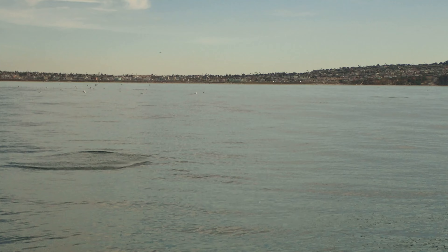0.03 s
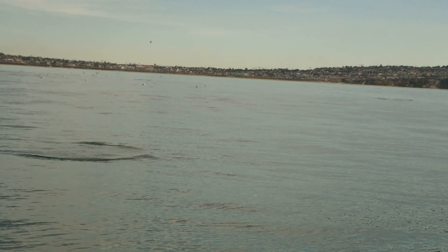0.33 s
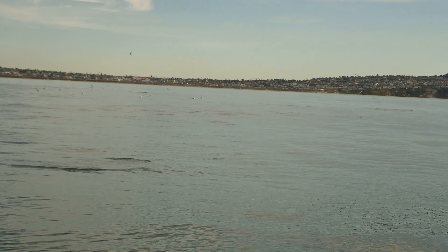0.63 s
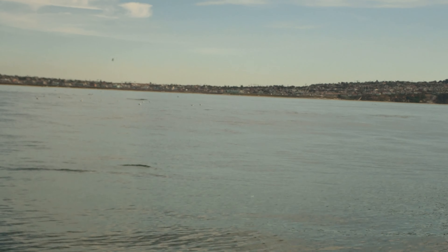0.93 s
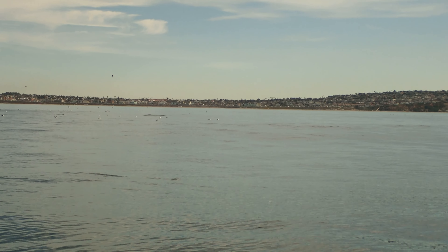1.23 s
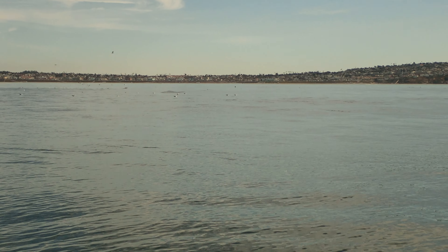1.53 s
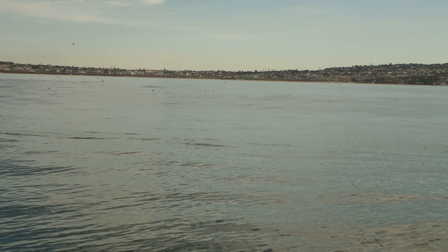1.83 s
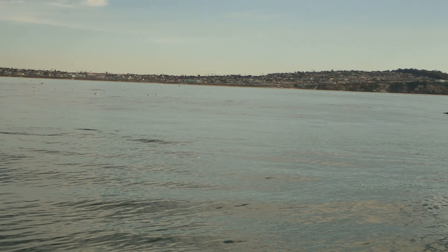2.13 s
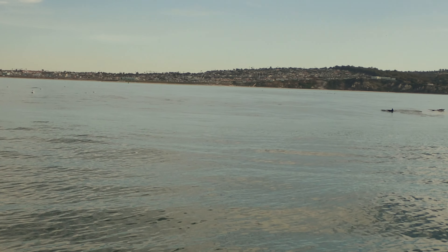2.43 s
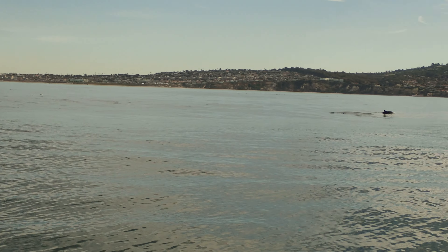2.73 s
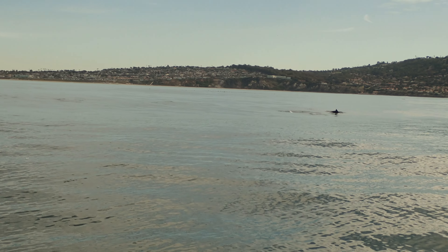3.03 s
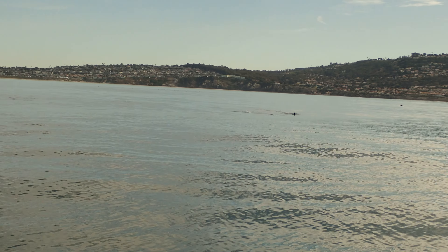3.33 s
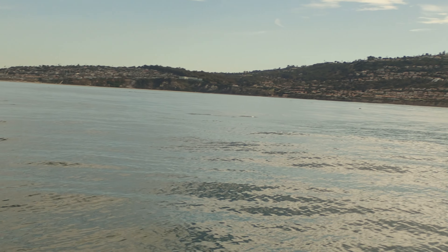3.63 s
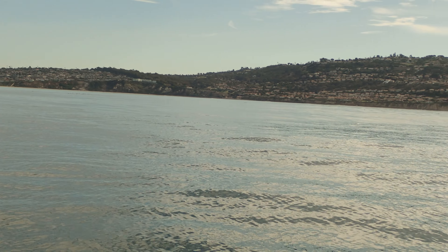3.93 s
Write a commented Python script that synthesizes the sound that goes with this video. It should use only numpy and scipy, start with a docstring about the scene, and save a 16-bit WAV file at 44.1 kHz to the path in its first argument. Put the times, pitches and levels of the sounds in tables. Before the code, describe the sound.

Distant birds yelp over and over above a low rumble and softly hissing sea water.

```python
"""Calm coastal sea from a small boat

Distant birds yelp in overlapping series of arched calls; lower honks, probably sea lions, come from
farther off, and both echo off water and cliffs. Under them lie a low rumble, faint engine tones, light
wind and the hiss of water, with small splashes, a slap on the hull and one knock aboard.
The sound fades in after an electric crackle in the left channel."""
import sys
import numpy as np
from scipy import signal
from scipy.io import wavfile

SR = 44100
rng = np.random.default_rng(int(sys.argv[2]) if len(sys.argv) > 2 else 0)


def to_wav(sig):
    """Store sig (one row per channel, or 1-D mono) as 16-bit WAV at the path in sys.argv[1].

    Samples outside -1..1 are clipped; the rate is SR.
    """
    pcm = np.clip(np.atleast_2d(sig), -1, 1) * 32767
    pcm = np.round(pcm).astype(np.int16)
    wavfile.write(sys.argv[1], SR, pcm.T)  # frames by channels


N = 176400
T = np.arange(N) / SR


def from_db(db):
    """The decibel scale: amplitude grows tenfold every 20 dB."""
    return np.exp(np.asarray(db) * (np.log(10) / 20))


def rms_one(x):
    """Normalisation to unit root-mean-square amplitude."""
    return x / np.sqrt(np.mean(x ** 2) + 1e-20)


def in_time(rows):
    """Linear interpolation of (time_s, value) rows at every sample."""
    return np.interp(T, *np.transpose(rows))


def at_hz(points, hz):
    """Interpolation of (frequency_hz, value) rows on a logarithmic frequency axis."""
    frequencies, values = np.transpose(points)
    return np.interp(np.log(hz), np.log(frequencies), values)


def drift(rate_hz):
    """Random modulation: low-passed noise with a spread of 1."""
    step = 40
    pole = np.exp(-2 * np.pi * rate_hz * step / SR)
    white = rng.standard_normal(N // step + 2002)
    slow = signal.lfilter([1], [1, -2 * pole, pole * pole], white)[2000:]
    return np.interp(np.arange(N) / step, np.arange(len(slow)), rms_one(slow))


def banded_noise(spectrum, flicker_db, coherence=None):
    """Partially coherent stereo noise of unit rms, in quarter-octave bands that flicker independently."""
    # Left-right likeness of the outdoor sound: frequency_hz, correlation
    outdoor_coherence = [(30, .5), (70, 0.96), (130, 1), (250, 0.97), (1000, 0.94), (2500, 0.9),
                         (5000, 0.088), (9000, 0.051), (15000, 0.12)]
    edges = 20 * 2 ** (np.arange(40) / 4)
    out, white = 0, rng.standard_normal((2, 2, N))
    for k, (low, high) in enumerate(zip(edges, edges[1:])):
        if high < spectrum[0][0] or low > spectrum[-1][0]:
            continue
        band = signal.butter(3, [low, high], "band", fs=SR, output="sos")
        mid, side = signal.sosfilt(band, white[k % 2])
        hz = np.sqrt(low * high)
        alike = at_hz(coherence or outdoor_coherence, hz)
        gain = from_db(at_hz(spectrum, hz) + flicker_db * drift(8.5))
        out = out + gain * (np.sqrt(1 + alike) * mid + np.sqrt(1 - alike) * side * [[1], [-1]])
    return rms_one(out)


def crackle(ring_hz=6180, whistle_hz=15000, ring_s=0.00048):
    """Impulses with ringing: each electric snap is a sharp tick inside two brief high tones."""
    # Electric snaps: time_s, tick_db, ring_db
    sparks = [(0.1455, 8, -19), (0.1479, 10, 4), (0.1489, 4.5, 0.5), (0.158, 11, -5.5), (0.1599, 1.5, -5.5)]
    ticks, rings = np.zeros(N), 0
    for time_s, tick_db, ring_db in sparks:
        ticks[int(time_s * SR)] = from_db(tick_db + 6.5)
        t = T - time_s
        tone = np.sin(2 * np.pi * ring_hz * t) + from_db(1) * np.sin(2 * np.pi * whistle_hz * t)
        rings = rings + from_db(ring_db) * np.exp(-np.minimum(np.abs(t) / ring_s, 20)) * tone
    ticks = signal.sosfilt(signal.butter(2, 5980, "high", fs=SR, output="sos"), ticks + 1e-18)
    return (ticks + rings) * from_db([[0], [-45]])  # almost wholly on the left


def engine_hum():
    """Amplitude and frequency modulation: three faint engine tones waver slowly."""
    # Engine tones: pitch_hz, level_db
    tones = [(192.5, -52), (246, -54.5), (346, -58.5)]
    out = 0
    for pitch_hz, level_db in tones:
        amplitude = np.sqrt(2) * from_db(level_db) * (1 + 0.35 * drift(1.4))
        hz = pitch_hz * (1 + 0.01214 * drift(5.46))
        out = out + amplitude * np.sin(2 * np.pi * np.cumsum(hz) / SR)
    return out


def rumble():
    """A continuous noise spectrum, strongest in the bass, is heard as a rumble."""
    # Rumble spectrum: frequency_hz, density_db
    spectrum = [(25, -27), (45, -12), (78, -1), (120, 1.5), (200, 0.5), (340, -1.5), (420, -10.5),
                (520, -12.5), (680, -20), (900, -28)]
    return from_db(-38) * banded_noise(spectrum, flicker_db=1.2)


def colony_din():
    """Incoherent summation: the far colony's voices merge into midrange noise."""
    # Din spectrum: frequency_hz, density_db
    spectrum = [(600, -14), (780, -2.5), (950, 4), (1250, -8), (1500, -2), (1750, -19.5), (2100, -19.5),
                (2600, -32), (3600, -45)]
    return from_db(-47) * banded_noise(spectrum, flicker_db=2.5)


def water_wash():
    """Amplitude-modulated noise: water washing near 2 kHz swells and ebbs."""
    # Swell of the wash: time_s, relative_db
    swell = [(.4, -59), (.8, -50.5), (1.1, -63.5), (1.6, -73), (2.9, -60), (3.0, -51), (3.1, -60), (4, -78)]
    # Wash spectrum: frequency_hz, density_db
    spectrum = [(1500, -3.5), (2100, 0), (2500, -22.5), (3000, -8)]
    return from_db(in_time(swell) - 4) * banded_noise(spectrum, flicker_db=1.5)


def water_hiss(resonance_hz=8840):
    """Resonance lifts one high band in the steady hiss of water."""
    # Hiss spectrum: frequency_hz, density_db
    spectrum = [(3000, -20.5), (4100, -14.5), (4900, -3), (6300, 1), (7700, -4), (9200, -3.5),
                (10800, -12.5), (13000, -9), (16000, -13)]
    hiss = banded_noise(spectrum, flicker_db=0.9)
    sheen = signal.lfilter(*signal.iirpeak(resonance_hz, Q=12, fs=SR), hiss)
    return from_db(-55.5) * (hiss + from_db(2) * sheen)


def wind():
    """Turbulent pressure: light wind buffets each microphone separately."""
    # Buffeting spectrum: frequency_hz, density_db
    spectrum = [(32, -4), (60, -1), (140, -1)]
    return from_db(-56.5) * banded_noise(spectrum, flicker_db=3.5, coherence=[(20, 0), (500, 0.024)])


def bird_yelps(rise_s=0.038, rise_depth=0.13, fall_depth=0.26):
    """Source and filter: three harmonics arch up and flick down through the throat's resonances."""
    # Yelps: crest_s, top_hz, harmonic_1_db, harmonic_2_db, harmonic_3_db
    yelps = [(0.281, 1620, -50, -72, -71), (0.309, 1740, -57, -70, -72), (0.568, 1775, -56.5, -63.5, -80.0),
             (0.585, 1645, -48.5, -67.5, -59), (0.835, 1785, -58.0, -68, -73.5),
             (0.889, 1666, -53.5, -70, -52), (0.967, 1487, -53, -75, -82), (1.099, 1760, -56.5, -68, -67.5),
             (1.194, 1670, -52, -72.0, -52), (1.227, 1560, -55, -75, -79.5), (1.36, 1770, -58, -66, -63.0),
             (1.454, 1725, -48, -62, -62), (1.497, 1678, -52, -70, -50.5), (1.622, 1747, -56, -66.5, -74),
             (1.739, 1732, -50.5, -62.5, -60), (1.795, 1675, -55.5, -69.0, -58),
             (1.885, 1745, -53, -73.0, -78), (2.02, 1750, -53.5, -64.0, -58), (2.095, 1660, -55, -76, -51),
             (2.144, 1660, -52.5, -71, -61), (2.292, 1747, -52.5, -71.5, -57),
             (2.398, 1667, -53.0, -68, -56), (2.564, 1740, -51, -62, -58), (2.695, 1667, -55, -69.5, -59.5),
             (2.83, 1734, -54, -62.5, -60), (2.877, 1530, -53.5, -74, -73), (2.996, 1695, -59, -69, -61),
             (3.097, 1740, -55, -65, -62.5), (3.147, 1543, -60.5, -78, -75), (3.298, 1660, -55, -74, -66.5),
             (3.365, 1727, -53.5, -64.5, -76), (3.418, 1556, -59.5, -91, -86), (3.583, 1682, -57, -67, -62),
             (3.637, 1715, -52, -63.5, -62), (3.689, 1537, -55.5, -88, -84.5),
             (3.884, 1673, -58.5, -68, -52.5), (3.902, 1712, -57, -66, -62),
             (3.962, 1550, -55.5, -89, -75.0)]
    # Response of the throat: frequency_hz, gain_db
    throat = [(1400, 2), (1750, -2), (2400, -9), (2800, 4), (3100, -3.5), (3500, 0), (4200, -21.5),
              (4650, -5), (4950, 1), (5300, -3.5)]
    out = np.zeros(N)
    wobble, flutter_db = 1 + 0.0054 * drift(147), 2.5 * drift(146)
    for crest_s, top_hz, *levels in yelps:
        fall_s = 0.033 + 0.00008 * (1740 - top_hz)  # lower yelps take longer to fall
        near = np.abs(T - crest_s) < 2 * max(rise_s, fall_s)
        t = T[near] - crest_s
        rising = t < 0
        from_crest = np.abs(t) / np.where(rising, rise_s, fall_s)
        flick = fall_depth * (1 - np.exp(-from_crest ** 2.42))
        droop = np.where(rising, rise_depth * from_crest ** 2, flick)
        hz = top_hz * np.maximum(1 - droop, 0.5) * wobble[near]
        phase = 2 * np.pi * (np.cumsum(hz) / SR + rng.random())
        swell = np.sqrt(2) * np.exp(-(from_crest / np.where(rising, 1.05, 1.25)) ** 10)
        tilt_db = np.where(rising, -6, 0) * from_crest ** 2  # each yelp starts dull and brightens
        for k, level_db in enumerate(levels, 1):
            colour_db = at_hz(throat, k * hz) - at_hz(throat, k * top_hz) + (k - 1) * tilt_db
            out[near] += from_db(level_db - 0.5 + flutter_db[near] + colour_db) * swell * np.sin(k * phase)
    return out + from_db(-9.5) * shore_echo(out)


def shore_echo(x, t60_s=0.56):
    """Diffuse reflection off water and cliffs: an exponential decay, nearly alike in both ears."""
    t = T[:SR // 2]
    mid, side = rng.standard_normal((2, len(t))) * from_db(-60 * t / t60_s)
    tails = [mid + 0.083 * side, mid - 0.4 * side]
    return np.array([signal.fftconvolve(x, tail / np.linalg.norm(tail))[:N] for tail in tails])


def far_honks():
    """Fast modulation makes short glides hoarse; distance leaves one strong partial and an echo."""
    # Honks: middle_s, pitch_hz, glide_hz_per_s, half_length_s, relative_db
    honks = [(0.404, 930, 2492, 0.036, -43), (0.474, 950, 1002, .03, -44), (0.633, 940, -2000, .035, -46.5),
             (0.743, 954, 4207, 0.034, -40), (0.834, 934, 1000, 0.021, -48),
             (1.16, 920, 3794, 0.035, -41.5), (1.298, 1107, -4, 0.047, -48.5),
             (1.746, 948, 506, 0.039, -45), (1.79, 1478, -1000, .03, -47), (1.861, 950, 2000, .03, -46),
             (2.055, 968, -500, 0.049, -47.5), (2.231, 1110, 0, .045, -49.5), (2.423, 970, 0, 0.036, -50),
             (2.518, 1104, 0, 0.046, -46.5), (2.621, 960, 2504, .022, -40.5), (2.779, 1093, 0, .035, -45.5),
             (2.916, 935, 1999, 0.033, -41.5), (2.997, 1002, 497, .035, -48.5),
             (3.219, 955, 2799.5, 0.023, -41.5), (3.297, 1000, 999, 0.023, -50),
             (3.527, 930, 3797, 0.03, -44.5), (3.692, 1450, -1800, 0.029, -48),
             (3.811, 915, 3300, 0.02, -42), (3.975, 1166, -1200, 0.031, -40)]
    out, wobble = np.zeros(N), 1 + 0.013 * drift(184)
    for middle_s, pitch_hz, glide, half_s, relative_db in honks:
        near = np.abs(T - middle_s) < 2 * half_s
        t = T[near] - middle_s
        hz = (pitch_hz + glide * t) * wobble[near]
        phase = 2 * np.pi * (np.cumsum(hz) / SR + rng.random())
        tone = np.sin(phase) + from_db(-25) * np.sin(2 * phase)
        swell = np.sqrt(2) * np.exp(-np.abs(t / half_s) ** 3)
        out[near] += from_db(relative_db - 1.5) * swell * tone
    out *= from_db(2.5 * drift(120))
    return out + from_db(-14) * shore_echo(out)


def splashes():
    """Noise transients: bright spray rises and falls under Gaussian envelopes."""
    # Small splashes: peak_s, rise_s, fall_s, level_db, left_minus_right_db
    bursts = [(.454, 0.00091, 0.0019, -35.5, 1), (.978, 0.021, 0.0089, -47.5, 4),
              (1.075, 0.013, 0.066, -54, 2), (1.396, 0.014, 0.012, -27.5, -3),
              (1.508, 0.0089, 0.0075, -40, -3), (2.96, 0.076, 0.11, -54, 0)]
    # Spray spectrum: frequency_hz, density_db
    spectrum = [(2800, -23), (4100, -13), (4900, 2), (5600, 2.5), (7400, -17.5), (9200, -13), (11000, -34),
                (16000, -37)]
    # Left-right likeness of the spray: frequency_hz, correlation
    coherence = [(2000, 0.96), (5000, 0.2), (9000, 0.11)]
    swell = 0
    for peak_s, rise_s, fall_s, level_db, pan_db in bursts:
        from_peak = (T - peak_s) / np.where(T < peak_s, rise_s, fall_s)
        gains = from_db([[level_db + pan_db / 2], [level_db - pan_db / 2]])
        swell = swell + gains * np.exp(-np.minimum(from_peak ** 2, 20))
    return swell * banded_noise(spectrum, flicker_db=1.5, coherence=coherence)


def knock(start_s=1.439, crack_decay_s=0.003):
    """Impact excitation: a hard little contact gives a crack and quickly damped modes."""
    # Modes of the struck object: frequency_hz, level_db, t60_s
    modes = [(137, -28, 0.14), (626, -44, .03), (1160, -28.5, 0.022), (1855, -26, 0.013),
             (4780, -21.5, 0.014), (5700, -21, 0.01), (6430, -26, 0.013), (8570, -21.5, 0.0064)]
    t = np.maximum(T - start_s, 0)
    ring = 0
    for k, (hz, level_db, t60_s) in enumerate(modes):
        decay = from_db(level_db - 60 * np.minimum(t / t60_s, 3))
        ring = ring + (-1) ** k * decay * np.sin(2 * np.pi * hz * t)
    band = signal.butter(2, [4300, 9000], "band", fs=SR, output="sos")
    grit = rms_one(signal.sosfilt(band, rng.standard_normal((2, N))))
    return ring + from_db(-26) * grit * (t > 0) * np.exp(-t / crack_decay_s)


def hull_slap(middle_s=1.48, half_s=0.047):
    """A band-limited noise burst: water slaps the hull with a hollow sound."""
    # Slap spectrum: frequency_hz, density_db
    spectrum = [(450, -17), (620, 3), (800, -3), (1100, -9), (1600, -20)]
    swell = np.exp(-((T - middle_s) / half_s) ** 2)
    return from_db(-39.5) * swell * banded_noise(spectrum, flicker_db=1)


def scene():
    """Superposition: the outdoor sources add and fade in together behind the crackle."""
    # Fade-in: time_s, gain_db
    fade_in = [(.12, -69), (.17, -15.5), (.25, -10.5), (.35, -1.5), (.45, 1.5)]
    background = engine_hum() + rumble() + colony_din() + water_wash() + water_hiss()
    events = bird_yelps() + far_honks() + splashes() + knock() + hull_slap()
    return from_db(in_time(fade_in)) * (background + events + wind()) + crackle()


def record(dry, stopband_hz=16800):
    """Overload clips the peaks, and a steep low-pass filter limits the bandwidth."""
    low_pass = signal.cheby2(16, 70, stopband_hz, fs=SR, output="sos")
    return signal.sosfilt(low_pass, np.clip(dry, -1, 1))


dry = scene()
out = record(dry)
to_wav(out)
```